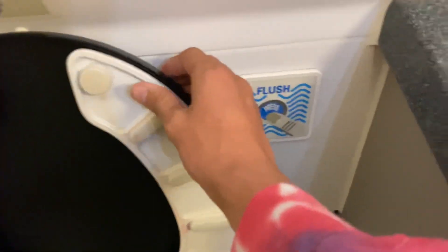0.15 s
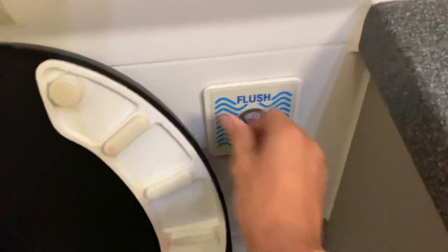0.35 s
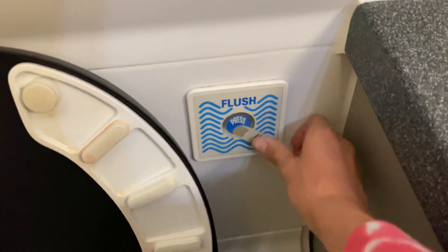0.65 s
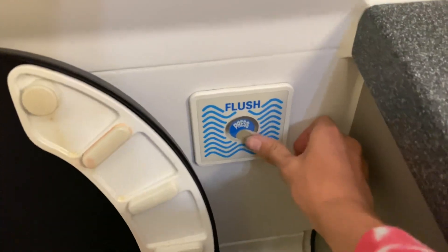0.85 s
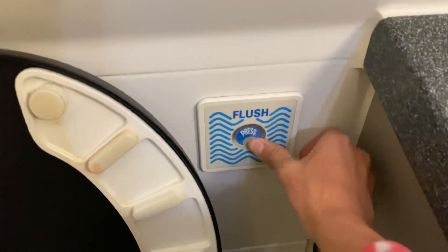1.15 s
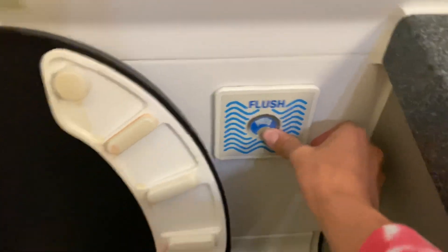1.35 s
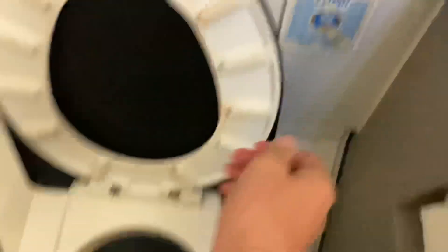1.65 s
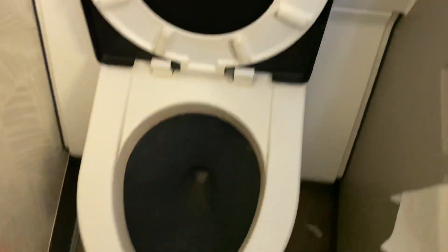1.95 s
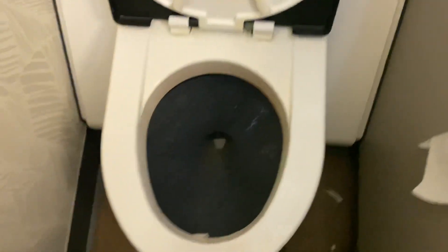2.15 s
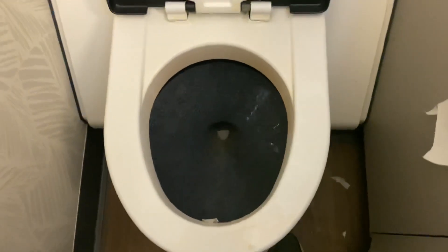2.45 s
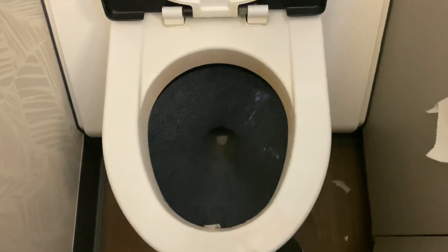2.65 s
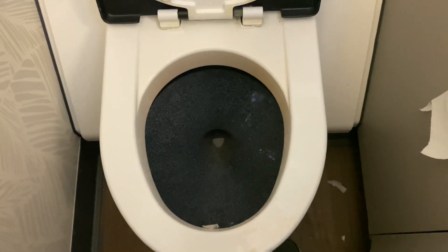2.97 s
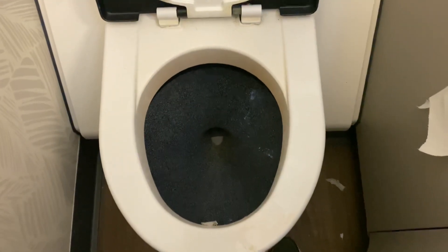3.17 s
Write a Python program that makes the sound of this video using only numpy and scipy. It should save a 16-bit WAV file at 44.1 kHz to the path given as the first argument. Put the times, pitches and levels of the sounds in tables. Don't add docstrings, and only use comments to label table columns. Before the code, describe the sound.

Aircraft vacuum toilet flush begins with a sharp hissing burst after plastic button clicks over cabin rumble.

```python
import sys
import numpy as np
from scipy import signal
from scipy.fft import rfft, irfft, next_fast_len
from scipy.io import wavfile

SR = 44100
rng = np.random.default_rng(int(sys.argv[2]) if len(sys.argv) > 2 else 0)


def log_audio(samples):
    frames = np.atleast_2d(samples).T
    limited = np.clip(frames, -1, 1)
    pcm = np.round(limited * 32767).astype(np.int16)
    wavfile.write(sys.argv[1], SR, pcm)


def linear_from_db(decibels):
    return 10 ** (np.asarray(decibels, float) / 20)


N = 145971

# t/s, f/Hz, level/dB
ENGINE_DRONE = [(0.0, 51.2, -20.5), (0.17, 48.3, -27), (0.4, 49.1, -26), (0.51, 55.25, -20.5),
                (0.69, 53.1, -21), (0.78, 50.37, -18), (1.39, 47.4, -19.5), (1.49, 49, -13.5),
                (1.64, 51.63, -31), (1.79, 49.75, -14), (1.94, 50.5, -29), (2.06, 46.9, -22.5),
                (2.5, 46.5, -23), (2.63, 46.64, -14), (2.9, 46.5, -31), (2.99, 49.13, -14),
                (3.11, 58.8, -26), (3.31, 60.5, -20)]
# t/s, level/dB, pan/dB
BOOM_SWELL = [(0.0, -46, -14), (0.06, -23.5, -13.5), (0.17, -16.5, 2), (0.2, -23, -1), (0.24, -13, 5),
              (0.28, -20.5, -4.5), (0.36, -18, -4), (2.02, -20.5, -0.5), (2.05, -41, 6), (2.09, -25.5, 11),
              (2.13, -26.5, -1), (2.37, -22, 4), (3.23, -27.5, -3), (3.26, -28, 4), (3.31, -24, -4)]
# f/Hz, width/Hz, level/dB
BOOTH_MODES = [(135.1, 39, 1.1), (175.5, 67, -1.5)]
# t/s, lag/ms
PHONE_TURN = [(0.01, -0.45), (.4, -0.063), (1.1, 0.59), (1.5, -0.75), (2.8, -0.036), (3.3, 0.57)]
# f/Hz, density/dB per Hz
LOW_ROAR_COLOUR = [(32, -16), (45, 1), (70, -4.5), (100, -11), (160, -6.5), (242, -13), (372, -12.5),
                   (1000, -25.5), (1250, -39.5)]
HIGH_ROAR_COLOUR = [(1000, 3), (1500, 0), (2000, -9), (3000, -16.5), (4500, -27), (11000, -34),
                    (12800, -36.5), (15500, -69.5)]
# f/Hz, width/Hz, level/dB
PANEL_MODES = [(313.8, 18.2, -28.5), (452, 5, -35.5), (626.7, 7.9, -37.5), (1158, 40, -44.5)]
# t/s, level/dB
PANEL_FACING = [(0.01, 2.5), (.35, 2), (.7, 0.5), (.95, 1), (1.3, 1.5), (1.7, 1), (2.2, 0.5), (2.8, 1.5),
                (3.3, -0.5)]
# f/Hz, likeness (-1 to 1)
STEREO_LIKENESS = [(60, 1), (105, 1), (160, -0.31), (300, 0.64), (500, -0.32), (750, -0.025), (3000, -0.36),
                   (15000, 0.23)]
# t/s, f/Hz, level/dB, pan/dB
FAN_TONE = [(0.01, 517, -36.5, -4), (.2, 519.3, -36, -3), (.42, 518.8, -38, -4), (.62, 520.2, -38.5, -4),
            (.8, 515.3, -37, -1), (1.15, 518.2, -37, -4), (1.35, 518.8, -43, -11), (1.7, 518.6, -40, -5),
            (1.95, 519, -34, 5), (2.15, 517.9, -35, -5), (2.35, 516.8, -41, -3), (2.6, 517, -29.5, 0),
            (2.88, 514.8, -26.5, -3), (2.97, 516, -33.5, -5), (3.12, 513.4, -32, -7), (3.3, 516.5, -39, -4)]
# t/s, f/Hz, level/dB
PUMP_TONE = [(0.01, 1364, -47), (.2, 1367, -61), (.33, 1380, -40.5), (.55, 1367, -52), (.85, 1373, -46),
             (1.05, 1367, -59), (1.45, 1364, -47.5), (1.65, 1376, -47.5), (1.88, 1367, -45),
             (2.0, 1369, -49.5), (2.1, 1360, -40.5), (2.3, 1351, -52), (2.42, 1367, -43),
             (2.7, 1377, -53.5), (3.3, 1390, -49)]
# t/s, f/Hz, level/dB
VENT_WHISTLE = [(0.01, 2740, -66), (.12, 2740, -58), (.33, 2760, -55), (.42, 2740, -57), (.5, 2815, -54.5),
                (.6, 2790, -60), (.7, 2750, -58), (.85, 2760, -62), (1.0, 2760, -68), (3.3, 2760, -70)]
# t/s, peak level/dB, housing ring/dB, treble edge/dB
BUTTON_TICKS = [
    (1.1165, -36, -9, -6.5),
    (1.1511, -33.5, -11, -5.5),
    (1.223, -30.5, -9, -7.5),
    (1.2437, -26, -10.5, -8.5),
    (1.3964, -20, -6.5, -12.5),
    (1.4035, -31, -5, -9),
    (1.409, -32.5, -2.5, -14),
    (1.4521, -34, -6, -7),
    (1.675, -36.5, -6.5, -8.5),
    (1.7, -37, -7, -9),
]
# f/Hz, density/dB per Hz
CRACK_COLOUR = [(1500, -22), (3000, -9), (4200, 2), (5500, 0), (7500, -3), (9500, 1), (12500, -2),
                (15500, -8)]
# f/Hz, level/dB, t60/s
PLATE_MODES = [(2543, -13, .03), (4150, -26, 0.022), (4740, -9, .03), (5300, -1, .02), (6060, -9, .015),
               (10300, -12.5, 0.0094), (9700, -12, .007), (12900, -21, .007)]
# f/Hz, width/Hz, level/dB
HOUSING_MODES = [(4940, 740, -10), (2580, 310, -19.5), (5500, 390, -10.5), (6500, 300, -22),
                 (3980, 540, -18)]
# t/s, level/dB, hold/s, t60/s
VALVE_SPURTS = [
    (3.0417, -28, 0.011, 0.12),
    (3.3005, -27.5, .01, .2),
]
# f/Hz, density/dB per Hz
VALVE_COLOUR = [(800, -5), (1500, 8), (2500, -2), (3400, -15), (4700, -11), (6500, -0.5), (12000, -10),
                (15000, -43)]
# f/Hz, width/Hz, level/dB
VALVE_MODES = [(1680, 100, -5.5), (2334, 100, -2.5), (2746, 80, -3.5), (4500, 290, -9.5), (5200, 200, -9),
               (7540, 500, -15)]
# t/s, level/dB, body over hiss/dB
AIR_JET = [(3.088, -62, 6), (3.101, -49, 1), (3.112, -49, 4), (3.118, -39, -3.5), (3.128, -41.5, 1),
           (3.14, -39, 0), (3.16, -38.5, -1), (3.18, -42.5, -1.5), (3.22, -47, -2), (3.26, -48, -2.5),
           (3.297, -49, -2.5)]
# f/Hz, density/dB per Hz
AIR_COLOUR = [(700, -14), (2000, 4.5), (3200, -2), (4500, -1), (6000, -4), (8500, -11), (11000, -7),
              (15500, -17)]
# f/Hz, level/dB
MIC_RESPONSE = [(4900, -0.01), (5300, -8), (6200, -6), (6900, 0.5), (7700, -6.5), (8400, 4.5),
                (12000, -1.5), (16300, 4)]
# f/Hz, level/dB
PORT_TILT = [(100, -.3), (330, 1.5), (550, -2), (2200, 3.5), (4700, -3), (5300, 2), (6400, .5),
             (7900, -4.5)]


def rms_one(x):
    return x / np.sqrt(np.mean(x ** 2) + 1e-20)


def in_time(rows):
    s, *columns = np.transpose(rows)
    return [np.interp(np.arange(N) / SR, s, c) for c in columns]


def at_hz(points, hz):
    f, value = np.transpose(points)
    return np.interp(np.log(hz + 1), np.log(f + 1), value)


def drift(rate):
    r = np.exp(-80 * np.pi * rate / SR)
    slow = signal.lfilter([1], [1, -2 * r, r * r], rng.standard_normal(N // 40 + 2002))
    slow = slow[2000:]
    return np.interp(np.arange(N) / 40, np.arange(len(slow)), rms_one(slow - slow.mean()))


def pan(db):
    return linear_from_db(np.array([db / 2, -db / 2]))


def spread(mid, side, alike):
    alike = np.clip(alike, -1, 1)
    return np.sqrt(1 + alike) * mid + np.sqrt(1 - alike) * side * [[1], [-1]]


def pair(alike):
    mid, side = rng.standard_normal((2, N))
    return spread(mid, side, alike) / np.sqrt(2)


def resonate(x, hz, width):
    r = np.exp(-np.pi * abs(width) / SR)
    poles = [1, -2 * r * np.cos(2 * np.pi * hz / SR), r * r]
    return signal.lfilter(np.array([1, 0, -1]) * (1 - r * r) / 2, poles, x)


def ringing(modes):
    return sum(linear_from_db(db) * rms_one(resonate(pair(0.27), hz, width)) for hz, width, db in modes)


def banded(colour, patchy_db, source=None):
    hz = np.fft.rfftfreq(N, 1 / SR)
    mid, side = rfft(rng.standard_normal((2, N)) if source is None else source)
    whole = linear_from_db(at_hz(colour, hz)) * spread(mid, side, at_hz(STEREO_LIKENESS, hz))
    place = 3 * np.log2((hz + 1) / colour[0][0])
    bands = int(place[hz < colour[-1][0]][-1]) + 2
    out, together = 0, drift(22.5)
    for k in range(bands):
        window = np.cos(np.pi / 2 * np.clip(place - k, -1, 1)) ** 2
        flicker = linear_from_db(patchy_db * (0.72 * together + drift(10.3)))
        out = out + flicker * irfft(whole * window, N)
    return rms_one(out)


def tone(hz, db):
    return np.sqrt(2) * linear_from_db(db) * np.sin(2 * np.pi * np.cumsum(hz) / SR)


def burst(s, attack, t60, hold=0.):
    t = np.arange(N) / SR - s
    return np.clip(t / attack, 0, 1) * linear_from_db(-60 * np.maximum(t - attack - hold, 0) / t60)


def engine_drone():
    hz, db = in_time(ENGINE_DRONE)
    return tone(hz + 2.5 * drift(9.0), db + 0.3)


def booth_boom():
    boom = 0
    for hz, width, db in BOOTH_MODES:
        boom = boom + linear_from_db(db) * rms_one(resonate(resonate(pair(1), hz, width), hz, width))
    lag_samples = in_time(PHONE_TURN)[0] * SR / 1000
    boom[1] = np.interp(np.arange(N) - lag_samples, np.arange(N), boom[1])
    db, pan_db = in_time(BOOM_SWELL)
    return linear_from_db(db - 0.5) * pan(pan_db) * rms_one(boom)


def airflow_roar():
    low = linear_from_db(-18.5) * banded(LOW_ROAR_COLOUR, patchy_db=1.35)
    high = linear_from_db(-36.5) * banded(HIGH_ROAR_COLOUR, patchy_db=1.87)
    return low + high


def cabin_panels():
    panels = 0
    for hz, width, db in PANEL_MODES:
        panels = panels + linear_from_db(db) * rms_one(resonate(pair(at_hz(STEREO_LIKENESS, hz)), hz, width))
    panels = signal.sosfilt(signal.butter(2, 6900, fs=SR, output="sos"), panels)
    return linear_from_db(in_time(PANEL_FACING)[0]) * panels


def cabin():
    return engine_drone() + booth_boom() + airflow_roar() + cabin_panels()


def fans():
    hz, db, pan_db = in_time(FAN_TONE)
    fan = tone(hz + 0.21 * drift(1.5), db + 2.2 * drift(12)) * pan(pan_db)
    hz, db = in_time(PUMP_TONE)
    pump = tone(hz + 0.51 * drift(1.17), db + 0.5 + 1.8 * drift(22)) * pan(2.3 * drift(1.7))
    whistle = tone(*in_time(VENT_WHISTLE))
    flutter_hz, steady = 60, 0.55
    vent = whistle * (steady + 0.8 * drift(flutter_hz))
    vent = vent + 0.8 * np.roll(whistle, 4) * drift(flutter_hz)
    return fan + pump + vent / np.sqrt(2)


def plate_ring(s, db):
    out = np.zeros((2, N))
    for hz, level_db, t60 in PLATE_MODES:
        strike_db = db + level_db - 8.5 + rng.normal(0, 3, (len(s), 2)).T
        clicks = np.full((2, N), 1e-18)
        clicks[:, (s * SR).astype(int)] = linear_from_db(strike_db) * rng.choice([-1, 1], (2, 1))
        r, w = linear_from_db(-60 / (t60 * SR)), 2 * np.pi * hz / SR
        out += signal.lfilter([0, np.sin(w)], [1, -2 * r * np.cos(w), r * r], clicks)
    return out


def button():
    s, db, ring_db, edge_db = np.transpose(BUTTON_TICKS)
    cracks = np.array([burst(t, 0.00084, 0.012) + linear_from_db(-18) * burst(t, 0.0025, 0.077) for t in s])
    noise = banded(CRACK_COLOUR, patchy_db=1.2)
    edge = signal.sosfiltfilt(signal.butter(4, 8500, "high", fs=SR, output="sos"), noise)
    crack = linear_from_db(db) @ cracks * (noise - edge) + linear_from_db(db + edge_db) @ cracks * edge
    ring = sum(linear_from_db(level) * burst(t, 0.0042, 0.11) for t, level in zip(s, db + ring_db))
    return linear_from_db(-3) * (crack + ring * ringing(HOUSING_MODES) + plate_ring(s, db))


def valve_spurts():
    envelope = sum(linear_from_db(db) * burst(s, 0.002, t60, hold) for s, db, hold, t60 in VALVE_SPURTS)
    spurts = envelope * (banded(VALVE_COLOUR, patchy_db=1.1) + ringing(VALVE_MODES))
    return signal.sosfilt(signal.butter(6, 13200, fs=SR, output="sos"), spurts)


def air_jet():
    drops_per_s, sputter_db = 4900, -12
    drops = (rng.random(N) < drops_per_s / SR) * linear_from_db(2.6 * np.minimum(rng.exponential(1, N), 5))
    air = rng.standard_normal((2, N)) * (1 + linear_from_db(sputter_db) * rms_one(drops))
    air = banded(AIR_COLOUR, patchy_db=1.2, source=air)
    body = signal.sosfiltfilt(signal.butter(4, 3300, fs=SR, output="sos"), air)
    hiss = air - body
    opened = np.clip((np.arange(N) / SR - AIR_JET[0][0]) / 0.01 + 1, 0, 1)
    db, body_db = in_time(AIR_JET)
    return opened * linear_from_db(db + 13.5) * (linear_from_db(body_db) * body + hiss)


def flush():
    return valve_spurts() + air_jet()


def scene():
    return cabin() + fans() + button() + flush()


def top_cut(x):
    return signal.sosfilt(signal.butter(12, 16340, fs=SR, output="sos"), x)


def record(dry):
    size = next_fast_len(N + SR // 10)
    hz = np.fft.rfftfreq(size, 1 / SR)
    split_hz, in_step_hz, cycle_hz, depth_db = 8150, 11150, 4850, 24
    heard = rfft(dry, size) * linear_from_db(at_hz(MIC_RESPONSE, hz)) * (hz < 15800)
    left, right = heard * pan(at_hz(PORT_TILT, hz) * (hz < split_hz))
    turn = np.pi * (hz - in_step_hz) / cycle_hz
    weights = pan(depth_db * np.cos(2 * turn))
    weights = np.sqrt(2 / np.sum(weights ** 2, axis=0)) * weights
    mid, side = np.where(hz > split_hz, weights, 1) * [left + right, left - right]
    out = irfft(np.array([mid + side, mid - side]) / 2, size)[:, :N]
    out = signal.sosfilt(signal.butter(5, 46, "high", fs=SR, output="sos"), out)
    return top_cut(out)


dry = scene()
out = record(dry)
log_audio(out)
```